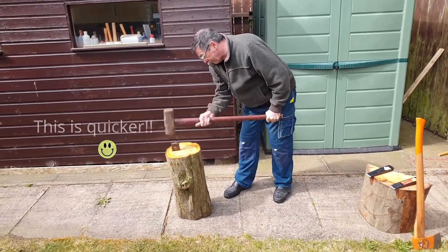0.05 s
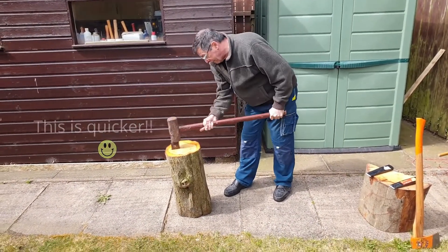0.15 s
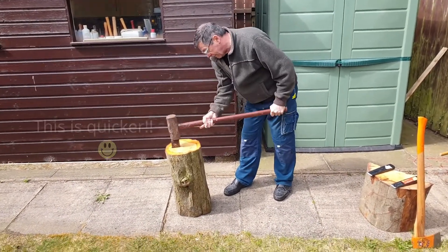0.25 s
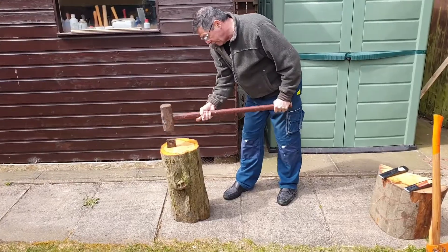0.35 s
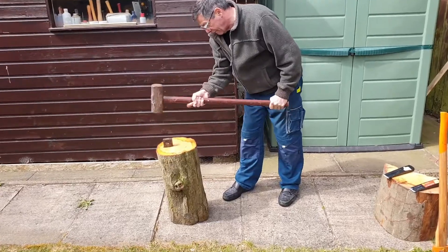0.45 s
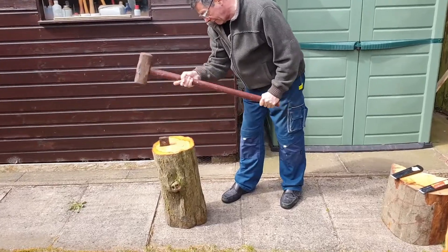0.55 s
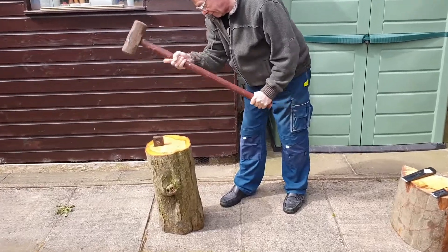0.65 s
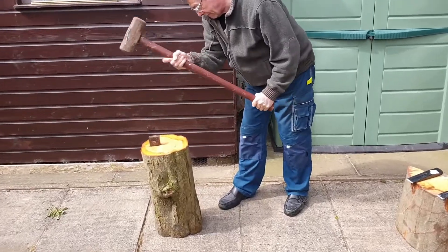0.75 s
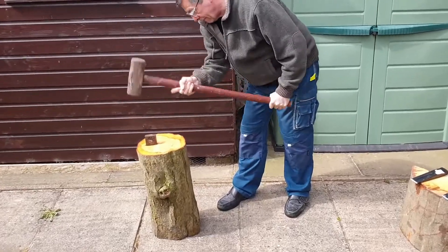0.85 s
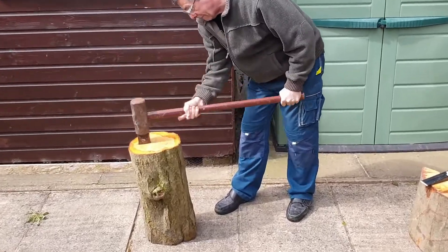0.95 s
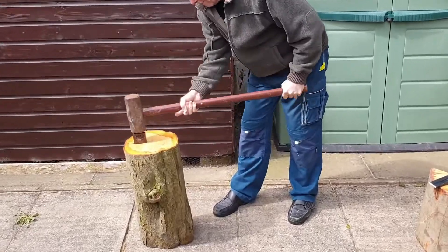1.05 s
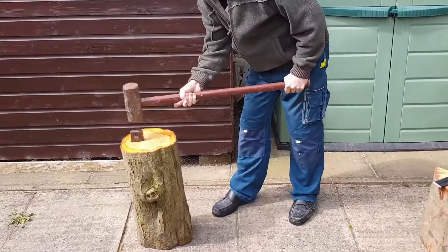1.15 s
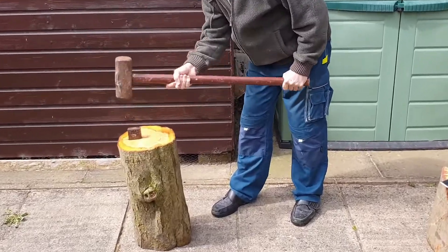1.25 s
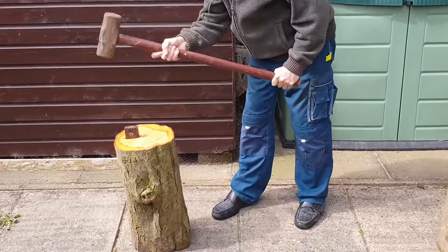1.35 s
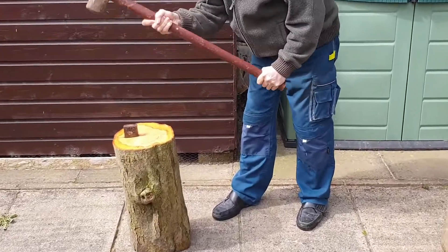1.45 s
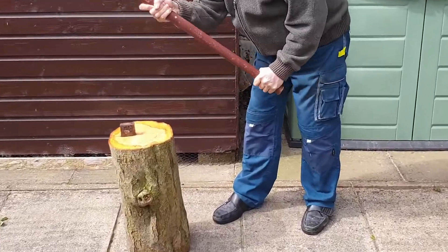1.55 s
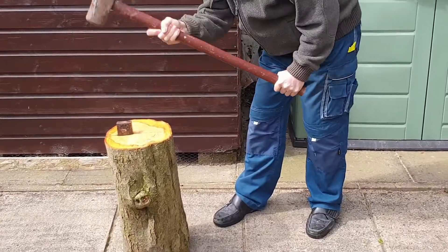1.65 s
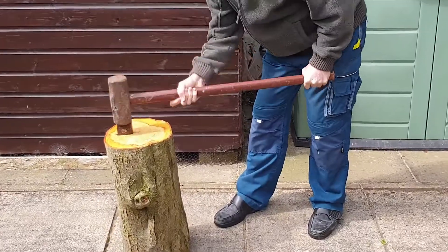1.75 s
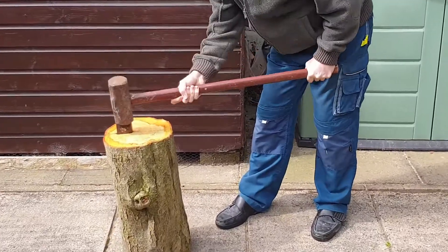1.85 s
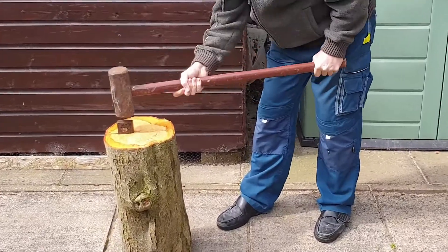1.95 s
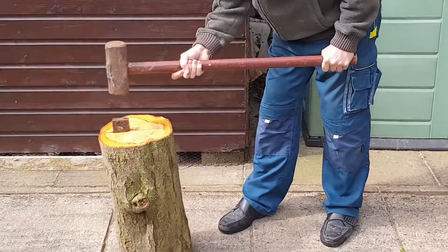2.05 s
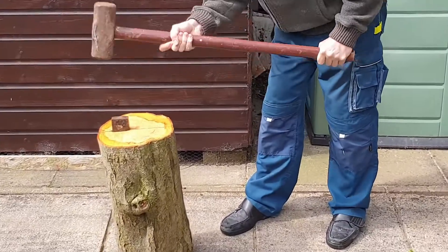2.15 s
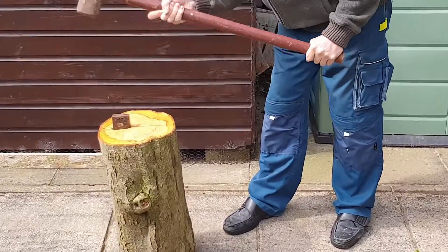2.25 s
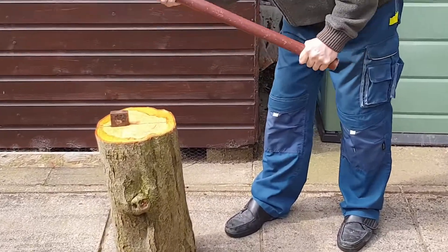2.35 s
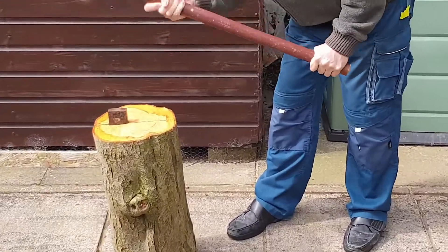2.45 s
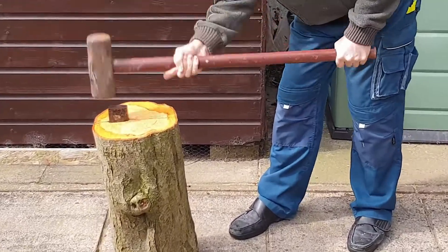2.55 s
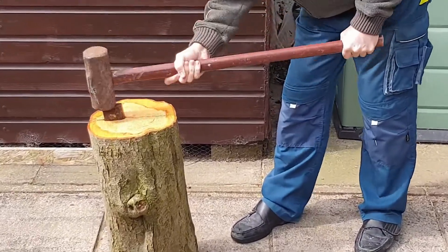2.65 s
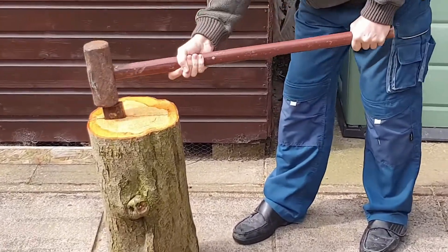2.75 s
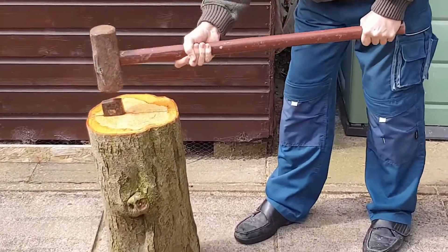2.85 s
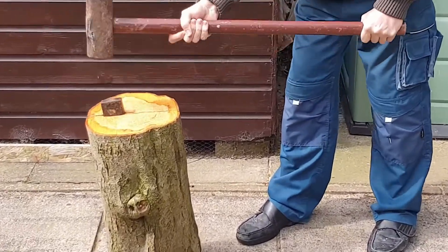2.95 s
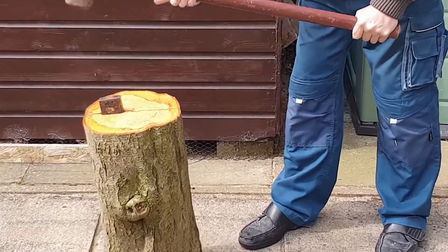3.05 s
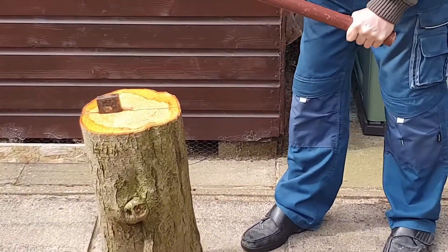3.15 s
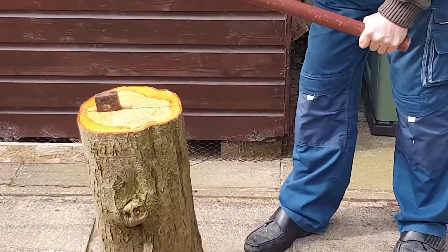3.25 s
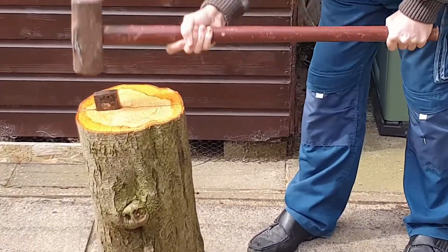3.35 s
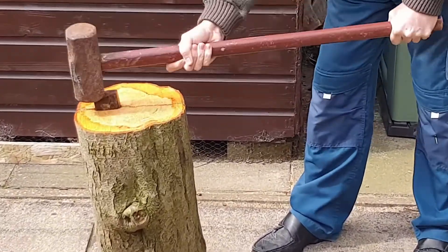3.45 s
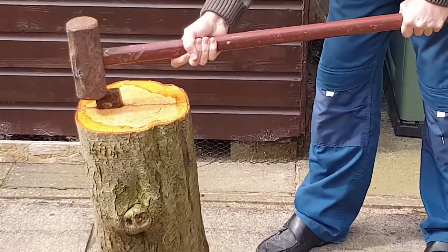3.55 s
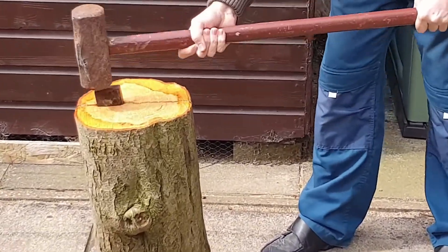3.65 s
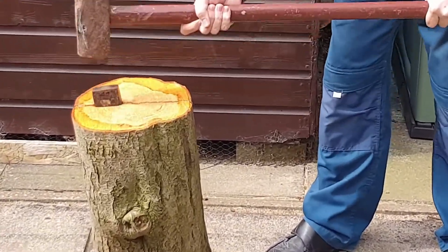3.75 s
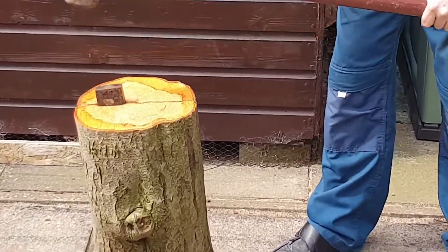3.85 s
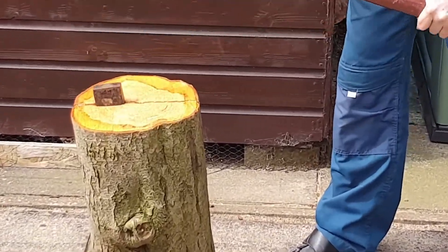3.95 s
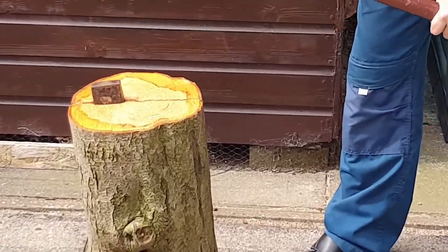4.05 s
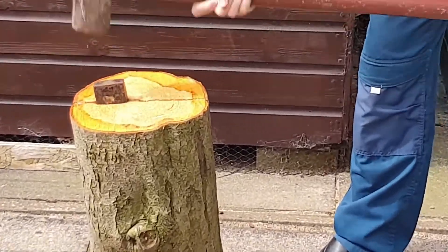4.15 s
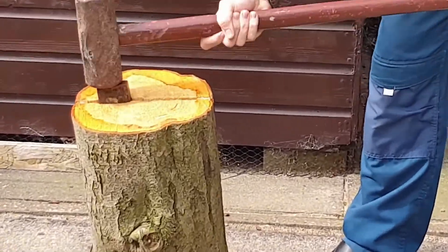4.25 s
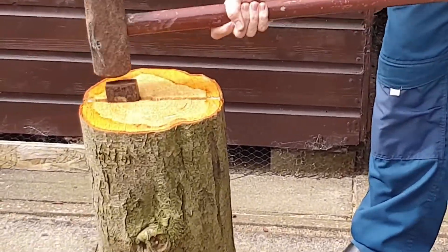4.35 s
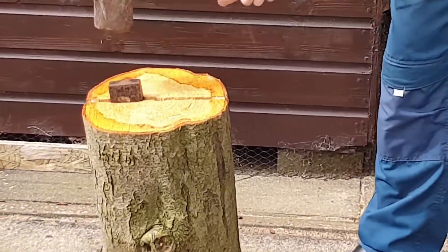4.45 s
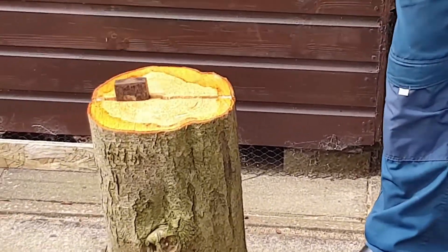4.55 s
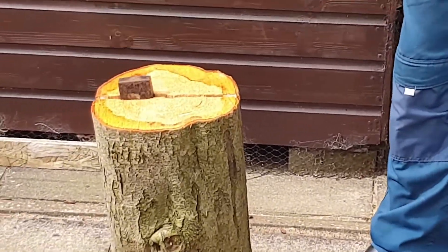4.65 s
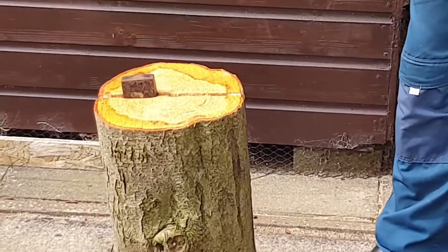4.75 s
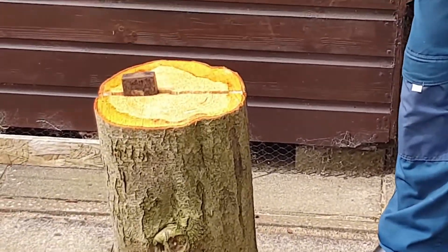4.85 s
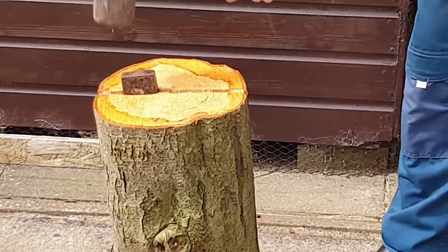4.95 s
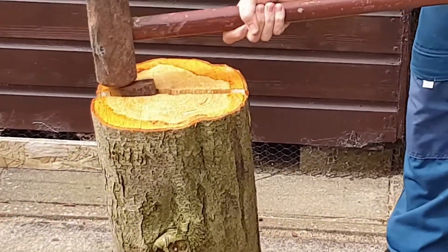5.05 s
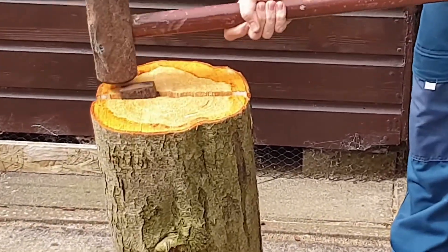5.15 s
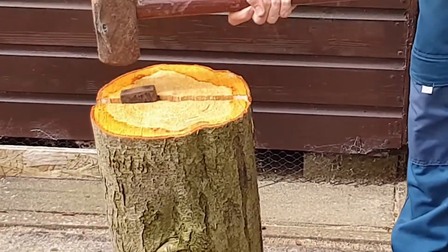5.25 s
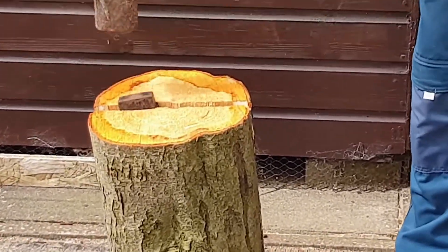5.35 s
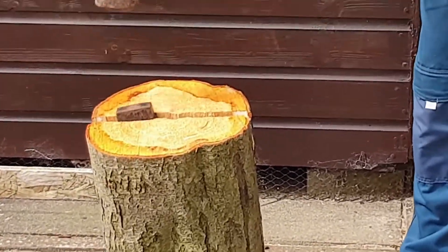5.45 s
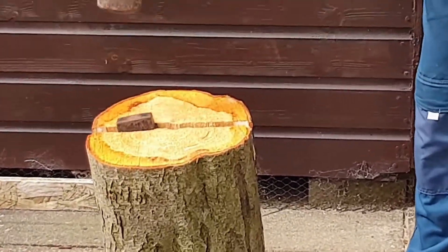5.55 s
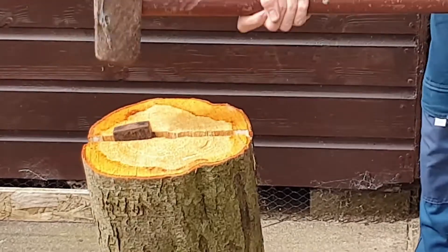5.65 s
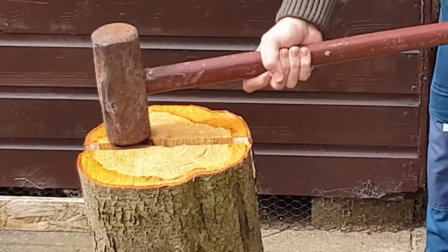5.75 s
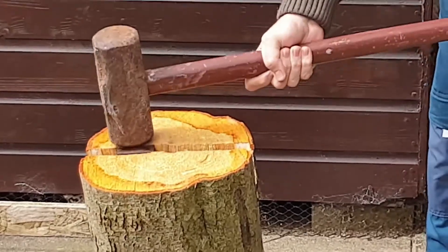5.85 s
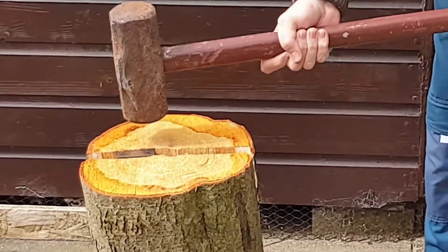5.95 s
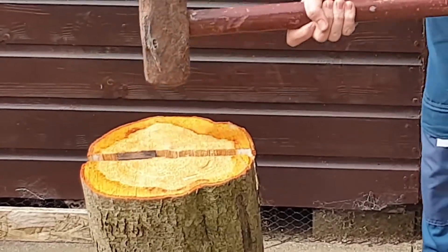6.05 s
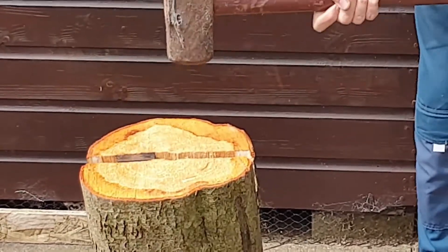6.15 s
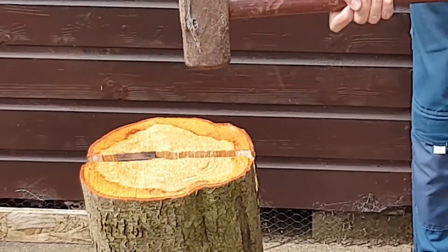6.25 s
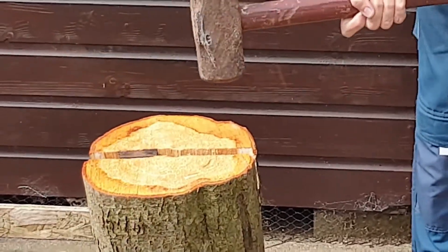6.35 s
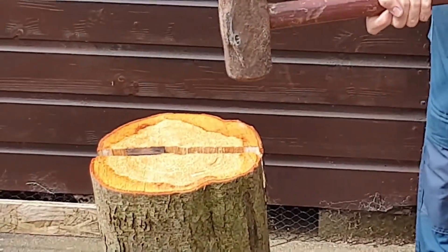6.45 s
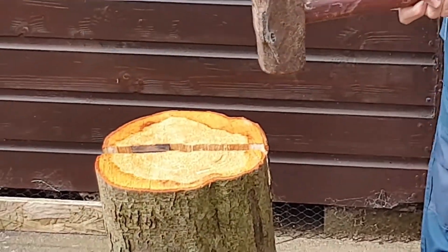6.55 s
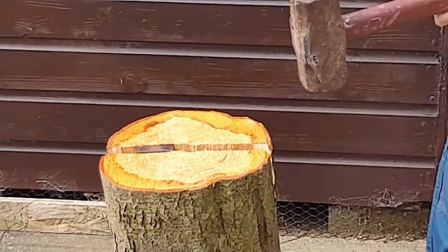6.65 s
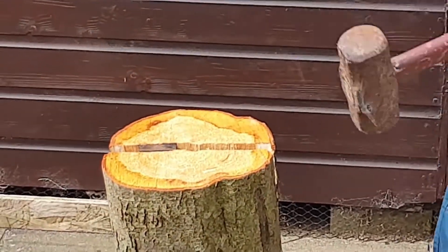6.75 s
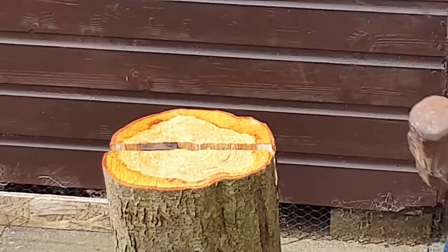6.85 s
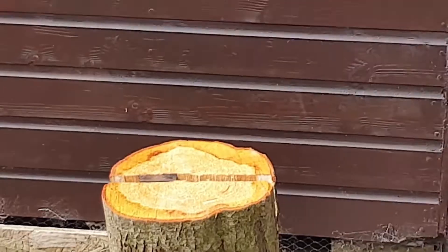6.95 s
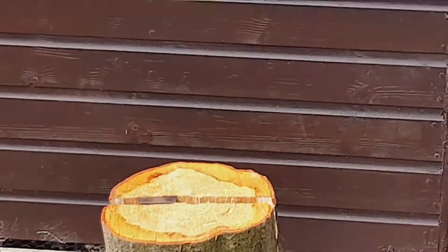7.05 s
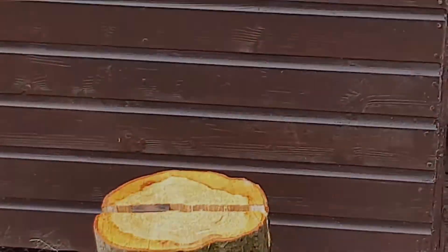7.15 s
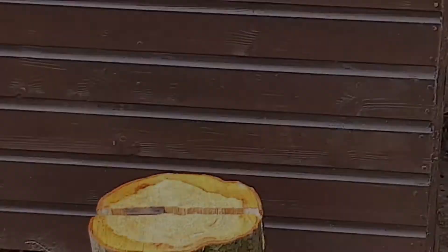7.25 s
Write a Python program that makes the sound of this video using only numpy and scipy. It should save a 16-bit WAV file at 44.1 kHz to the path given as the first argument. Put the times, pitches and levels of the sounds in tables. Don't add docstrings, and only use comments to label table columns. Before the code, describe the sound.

A quiet paved yard between sheds, close stereo microphone, faint air and distant thin bird chirps. A sledgehammer hits a steel wedge in a standing log at about 0.2, 1.0, 1.9, 2.7, 3.5, 4.3, 5.1 and 5.8 seconds. Each blow is an abrupt metallic crack, a dry short wooden thud with a tiny rebound, and a high steel ring, thrown back by walls in a brief bright tail. The first is dull; the sixth is a flat hard slap; the seventh rings brightest; the last is softer and woodier. From 3.3 seconds torn fibres tick between blows, with a sharp snap and bouncing splinter at 5.3. Light wind puffs grow into a strong low buffet around 5.5, then fluttering gusts from 6 to the end at about 7.3. Soles scuff over grit, clearest near 7.0.

```python
import sys
import numpy as np
from scipy import signal
from scipy.fft import rfft, irfft, next_fast_len
from scipy.io import wavfile
from scipy.ndimage import uniform_filter1d, minimum_filter1d

SR = 44100
rng = np.random.default_rng(int(sys.argv[2]) if len(sys.argv) > 2 else 0)


def put_to_file(sound):
    columns = np.atleast_2d(sound).T
    safe = np.clip(columns, -1, 1)
    whole_steps = np.round(safe * 32767)
    wavfile.write(sys.argv[1], SR, whole_steps.astype(np.int16))


def rack_gain(trim_db):
    fader = np.asarray(trim_db, float)
    return 10 ** (fader / 20)


N = 321038
LEVEL_TIMES = np.arange(0, N + 88, 88)
PORT_LAG_S = .0004

# start in seconds, crack in dB, crack tilt in dB per octave,
# crack sent to the yard in dB, slap in dB.
BLOWS = [
    (0.19, -5, -3, 5, -8),
    (1.026, -4.5, 0.84, 5.5, 3),
    (1.869, -4, 0.74, 4, 4),
    (2.6804, -4, 0.4, 1, 1),
    (3.4883, -5, 0.65, 4, 4),
    (4.3005, -4.5, 0.7, 5, 8.5),
    (5.0995, -6, 2.6, 0.45, 4.5),
    (5.8268, -13.5, -0.94, 6, 3),
]
# pitch in Hz, level in dB, time to fall 60 dB in seconds.
BODY = [(233.6, 0.96, 0.031), (341.7, -1.6, 0.046)]
# pitch in Hz, level in dB, time to fall 60 dB in seconds.
KNOCK = [(422, -0.5, 0.016), (516, -8.5, 0.018)]


def evened(x):
    return x / np.sqrt(np.mean(x ** 2) + 1e-20)


def read(points, hz, order=1):
    table = np.transpose(points)
    return np.interp(np.log(hz + 1), np.log(table[0] + 1), table[order])


def add(mix, s, sound):
    part = mix[..., round(s * SR):][..., :sound.shape[-1]]
    part += sound[..., :part.shape[-1]]


def sides(pan_db):
    return rack_gain(np.array([[.5], [-.5]]) * pan_db)


def coloured(points, shape):
    size = next_fast_len(shape[-1])
    z = rfft(rng.standard_normal((shape[0], size)))
    hz = np.linspace(0, SR / 2, z.shape[-1])
    return evened(irfft(z * rack_gain(read(points, hz)), size)[:, :shape[-1]])


def ring(modes, db, drift, rise=1e-4, longer=1):
    t = np.arange(SR // 2) / SR
    chance = rng.standard_normal((len(modes), 2))
    total = 0
    for (hz, mode_db, t60), (a, b) in zip(modes, chance):
        fading = rack_gain(mode_db + 0.71 * a - 60 * t / (t60 * longer))
        total = total + fading * np.sin(2 * np.pi * hz * (1 + drift * b) * t)
    return rack_gain(db) * (1 - np.exp(-t / rise)) * total


def click(points, tilt_db, slap_db=0):
    slap_hz, slap_octaves = 1290, 0.54
    hz = abs(np.fft.fftfreq(2048, 1 / SR))
    tilt = tilt_db * np.log2((hz + 1) / 4000)
    slap = slap_db * np.exp(-(np.log2((hz + 1) / slap_hz) / slap_octaves) ** 2)
    log_gain = np.log(rack_gain(np.maximum(read(points, hz) + tilt + slap, -100)))
    pulse = np.fft.ifft(np.exp(np.conj(signal.hilbert(log_gain)))).real[:512]
    return pulse / np.linalg.norm(pulse)


def chatter(count, t60):
    hits = rng.standard_normal(count) * rack_gain(-8.5 - 60 * np.arange(count) / SR / t60)
    return np.concatenate([[1], hits])


def swell(s, db, half_s):
    return db - 9 * ((LEVEL_TIMES / SR - s) / half_s) ** 2


def pile(powers):
    levels = np.sqrt(sum(powers))
    return np.array([np.interp(np.arange(N), LEVEL_TIMES, level) for level in levels])


def lumps(rate_hz, depth_db):
    slow = signal.lfilter(*signal.butter(3, rate_hz, fs=SR), rng.standard_normal((2, N)))
    return evened(rack_gain(depth_db * evened(slow)))


def steady(x, span_s):
    span = round(span_s * SR)
    power = uniform_filter1d(uniform_filter1d(x ** 2, span), span)
    return evened(x / np.sqrt(power + 0.015))


def still_air():
    # frequency in Hz, level in dB.
    air_colour = [(18, -13.5), (30, 8), (70, -1), (206, -18.5), (455, -17.5), (3130, -28.5), (5160, -27),
                  (5740, -25.5), (7880, -24), (9230, -37.5), (14800, -29.5), (16500, -45)]
    return rack_gain(-71) * coloured(air_colour, (2, N))


def wind():
    # frequency in Hz, level in dB.
    rumble_colour = [(20, -13.5), (40, 12), (75, 8.5), (150, -3.5), (260, -17.5), (420, -63.5), (700, -110)]
    flutter_colour = [(150, -27), (280, 3.5), (450, -4.5), (650, -15), (900, -33.5), (1400, -55.5),
                      (2200, -120)]
    whip_colour = [(400, 4), (600, -22), (800, -6.5), (1000, -16.5), (1500, -44), (2200, -120)]
    # time in seconds, rumble in dB.
    breeze = [(0, -97.5), (.5, -81.5), (.8, -93), (2, -81.5), (3.1, -70.5), (3.999, -63.5), (4.9, -87),
              (5.4, -57), (7.28, -64)]
    # peak in seconds, rumble in dB, half length in seconds, left-right in dB.
    puffs = [(0.084, -59.5, 0.064, 0.5), (0.453, -51, 0.052, 0), (0.56, -68, 0.049, 2),
             (0.644, -57.5, 0.026, 4.5), (0.96, -63.5, 0.1, -1), (1.3, -50, 0.042, 2),
             (1.43, -59, 0.038, -4.5), (1.534, -64.5, 0.014, -13), (1.64, -80, 0.045, -18),
             (1.81, -71, 0.02, -6), (2.11, -53.5, 0.043, -12), (2.228, -44.5, 0.012, -11.5),
             (2.303, -54, 0.087, -4), (2.521, -63, 0.04, -5), (2.98, -49, 0.071, -14),
             (3.127, -55.5, 0.13, -17.5), (3.29, -54, 0.063, -23), (3.45, -74, .04, -7.5),
             (3.729, -36.5, 0.014, 9), (3.807, -47, 0.081, 3.5), (4.11, -58, 0.025, -10),
             (4.227, -52.5, 0.055, -14), (4.575, -49, 0.042, -8), (4.672, -52.5, 0.044, -16),
             (4.738, -57.5, .03, -13), (5.06, -68, 0.055, -8.5)]
    # peak in seconds, rumble in dB, half length in seconds, left-right in dB,
    # extra flutter in dB.
    buffets = [(5.438, -45.5, 0.033, -28, 8.5), (5.53, -20, 0.026, -3.5, -2), (5.589, -22, 0.03, -2.5, -2),
               (5.662, -47, 0.036, -21, 11), (5.78, -42.5, 0.055, -18, 1.5), (6.057, -34.5, 0.066, 2, -10),
               (6.19, -29, 0.043, -10.5, 5.5), (6.317, -33.5, 0.064, -11.5, 0),
               (6.405, -39, 0.024, -12.5, 9.5), (6.505, -42.5, 0.047, -11.5, -7),
               (6.609, -38.5, 0.022, -3, -9.5), (6.753, -49.5, 0.024, -5, -1),
               (6.827, -43, 0.054, -4.5, -1), (6.959, -52.5, 0.028, 9, 7), (7.022, -36.5, 0.027, 6, 2),
               (7.085, -32, 0.019, 7, 3.5), (7.145, -36, 0.018, -19.5, 12), (7.18, -34.5, 0.035, -9.5, 10),
               (7.235, -30.5, 0.023, 0, 12), (7.264, -23, 0.01, -1.5, 1.5)]
    breeze_pan_db = -16
    flutter_db, flutter_growth, flutter_pan = -62, 1.05, -0.21
    whip_db, whip_growth = -9, 1.2
    draught_shared = 0.27

    breeze_db = np.interp(LEVEL_TIMES / SR, *np.transpose(breeze))
    eddies = [(breeze_db, breeze_pan_db, 0)]
    eddies += [(swell(s, db, half), pan, 0) for s, db, half, pan in puffs]
    eddies += [(swell(s, db, half), pan, extra) for s, db, half, pan, extra in buffets]
    push = pile((rack_gain(db) * sides(pan)) ** 2 for db, pan, _ in eddies)
    shake = pile((rack_gain(flutter_db + flutter_growth * (db + 41.5) + extra)
                  * sides(flutter_pan * pan + 7.5)) ** 2 for db, pan, extra in eddies)
    pressure = coloured(rumble_colour, (2, N))
    rumble = steady(evened(pressure + draught_shared * pressure[::-1]), 0.0042) * push
    whip = coloured(whip_colour, (2, N)) * rack_gain(whip_db) * (shake * rack_gain(33)) ** whip_growth
    flutter = (coloured(flutter_colour, (2, N)) + whip) * rack_gain(4.5) * shake
    return rumble * lumps(22., 3.5) + flutter * lumps(40., 5.)


def birds():
    # start in seconds, end in seconds,
    # start pitch in Hz, end pitch in Hz, level in dB.
    chirps = [(.02, 0.189, 7115, 7600, -82), (0.703, 1.01, 6520, 5610, -76),
              (1.56, 1.66, 6250, 8280, -78.5), (1.663, 1.755, 7420, 8200, -80.5),
              (2.39, 2.49, 6390, 7500, -74.5), (2.491, 2.58, 6380, 7448, -77),
              (2.575, 2.67, 6580, 7340, -74.5), (5.52, 5.818, 6160, 4640, -75.5),
              (6.1, 6.6, 5000, 5180, -75.5), (6.45, 6.63, 5400, 8200, -74.5), (6.5, 6.63, 9860, 10600, -77),
              (6.55, 6.78, 6930, 6550, -76), (6.64, 6.75, 11600, 10800, -77),
              (6.145, 6.175, 14400, 12000, -83), (6.18, 6.22, 14690, 11600, -77)]
    whistles = [
        (2.119, 2.222, 6470, 6480, -67.5),
        (2.923, 3.17, 6590, 6380, -74),
        (3.18, 3.33, 4560, 4450, -78.5),
        (5, 5.089, 5230, 5170, -78.5),
    ]
    husky_notes = [
        (.03, .11, 3600, 3480, -77.5),
        (.09, .16, 3630, 3560, -73),
        (0.155, 0.19, 3520, 3410, -66),
        (2.44, 2.51, 3720, 4540, -81),
    ]
    out = np.zeros((2, N))
    for calls, width_hz in (chirps, 1000), (whistles, 46), (husky_notes, 310):
        for start, end, start_hz, end_hz, db in calls:
            size = round((end - start) * SR)
            a, b = rng.standard_normal((2, 2, SR))[..., :size]
            blur = signal.lfilter(*signal.butter(2, width_hz / 2, fs=SR), a + 1j * b)
            glide_hz = np.linspace(start_hz, end_hz, size)
            turn = np.exp(2j * np.pi * np.cumsum(glide_hz) / SR)
            call = evened((blur * turn).real) * signal.windows.tukey(size, .6)
            add(out, max(start, 0), rack_gain(db) * call)
    return out


def steel_crack(blow, spark_db, dull_db):
    # frequency in Hz, level in dB.
    crack_colour = [(470, -24.5), (800, -1.5), (1150, -6.5), (1700, -2.5), (3220, -7), (3750, -7),
                    (7530, -10), (10900, -17.5), (12300, -16), (13900, -11.5), (15500, -17.5),
                    (16500, -41.5)]
    _, crack_db, tilt_db, wet_db, slap_db = blow
    muffle = wet_db - 4.0
    crack = rack_gain(crack_db + 11.0) * click(crack_colour, tilt_db + .5 * muffle + dull_db, slap_db)
    spark = rack_gain(crack_db + spark_db + 8.0 + 0.32 * muffle) * click(crack_colour, tilt_db + 2.5, slap_db)
    return np.convolve(spark, chatter(count=400, t60=0.012)), crack * rack_gain(wet_db)


def end_grain_push(db):
    # frequency in Hz, level in dB.
    push_colour = [(70, -19.5), (140, -3), (350, 0), (700, -3.5), (950, -15), (1500, -47)]
    return rack_gain(db - 12.5 + 7) * np.convolve(click(push_colour, 0), chatter(count=1200, t60=0.051))


def log_thud(thud, rise, lean_db):
    # pitch in Hz, level in dB, time to fall 60 dB in seconds.
    deep = [(115, -2, 0.039), (150, -8, .035)]
    halves = [(599, -12.5, 0.11), (659.4, -2.5, 0.034), (740, -11.5, 0.005)]
    deep_db, body_db, knock_db, _, split_db = thud
    body = [(hz, db + side * lean_db, t60) for (hz, db, t60), side in zip(BODY, (-.5, .5))]
    clack = -ring(body, body_db + 6.5, 1 / 100, rise)
    clack -= ring(KNOCK, knock_db + 7.0, .012, rise)
    clack -= ring(halves, split_db + 3.5, 0.0028, rise)
    return clack, -ring(deep, deep_db + 4.5, 0.0055)


def wedge_ring(wedge_db, seat, end_db):
    # pitch in Hz, level in dB, time to fall 60 dB in seconds.
    gripped = [(1560, -21.5, 0.065), (1724, -30.5, 0.039), (2140, -20.5, 0.035), (2334, -26, 0.014),
               (2784, -29.5, 0.022), (4150, -22, .05)]
    top_db = max(db for _, _, db in seat)
    free_end = [(hz, db - top_db, 2.2 / np.clip(width, 30, 200)) for hz, width, db in seat]
    return ring(gripped, wedge_db, 0.017) + ring(free_end, -21 + wedge_db + end_db, 0)


def steel_ring(grip, longer):
    # pitch in Hz, level in dB, time to fall 60 dB in seconds.
    low = [(3833, -6, 0.1), (3886, -6, 0.3), (3925, -7, .09), (3788, -12, .09)]
    middle = [(4704, 0, 0.13), (4667, -7, 0.09), (4625, -12, .08), (5520, -13, 0.07)]
    upper = [(6992, -9, .13), (7530, -5, .12), (7747, -6, 0.13), (7715, -8, .07), (8457, -8, 0.07),
             (8970, -9, 0.08)]
    high = [(12015, 6, 0.12), (11985, -5, 0.07), (12280, -12, .12), (12620, -7, .06)]
    top = [(14272, -1, .22), (14600, -9, .1), (15110, -7, .07), (13650, -10, .1)]
    edge = [(11370, -2, 0.15), (10770, -4, 0.14), (11080, -5, 0.08), (9800, -8, .1)]
    families = low, middle, upper, high, top, edge
    return sum(ring(family, db, .0003, longer=longer) for family, db in zip(families, grip))


def blows():
    # deep thud, log body, bright knock, wedge, split clack,
    # all in dB.
    thuds = [(-25, -14, -15.5, -3, -15.5), (-21, -15, -16, -8, -16), (-18.5, -15.5, -15.5, -4, -16.5),
             (-15.5, -22, -19, -10.5, -25), (-18, -16.5, -21.5, -6.5, -17.5), (-14, -18.5, -14, -9, -12),
             (-18.5, -22.5, -16.5, -1, -11), (-25, -28.5, -16, -14, -11.5)]
    # 3.9, 4.7, 7.5, 12, 14 and 11 kHz families, all in dB.
    grips = [(-26.5, -33.5, -34.5, -22, -42, -39), (-30.5, -36.5, -27.5, -18, -41, -34.5),
             (-31, -31, -32, -20, -38.5, -38), (-32.5, -45.5, -31, -26, -40, -40),
             (-32.5, -42.5, -28.5, -24, -24.5, -34.5), (-40.5, -38, -31.5, -23.5, -38.5, -34.5),
             (-14, -16, -17, -24.5, -32, -32.5), (-11.5, -25.5, -20, -36, -27, -26.5)]
    # wood rise in seconds, rebound delay in seconds, rebound in dB,
    # steel ring length factor, spark in dB.
    landings = [(.0011, .011, -11.5, 1.01, 0.3), (.0011, .011, -13.5, 1.01, -0.87),
                (.0011, 0.01, -8.5, 0.91, 0), (.0011, 0.014, -9.5, 1.01, 1.1),
                (.0011, .011, -14.5, 1.1, -0.6), (.002, .0105, -5.5, 1.01, -0.7),
                (.002, 0.01084, -6, 1.1, -1), (.003, 0.01092, 4, 1.03, -3)]
    # pitch in Hz, width in Hz, level in dB.
    seats = [
        [(2351, 97, -1), (3620, 25, -4.5), (4340, 99, -1), (5460, 79, -8.5)],
        [(2540, 57, -2), (3910, 53, -1), (4320, 53, -4), (5400, 41, -1.5)],
        [(1520, 57, -3), (3760, 68, -2.5), (4330, 82, -1.5), (5070, 97, -1)],
        [(1520, 59, -0.5), (2120, 26, -4), (3490, 240, -2.5), (5560, 130, -7.5)],
        [(2070, 130, 4), (3350, 75, -2), (5414, 55, -3.5), (6380, 88, -1)],
        [(1550, 97, -2), (3080, 130, -4), (4290, 210, -3), (4990, 140, -6.5)],
        [(1442, 54, 2), (2092, 29, -6.5), (2490, 45, -5.5), (2800, 50, -10)],
        [(1590, 47, -7.5), (2200, 46, -17), (2360, 26, -1.5), (2777, 100, 2)],
    ]
    # lean to the log's upper body tone in dB, treble lost on the way to
    # the yard in dB per octave, wedge end ring in dB, dull push in dB.
    sits = [(3, -.5, 0.5, 0.5), (-2.5, -1, 2.5, -1.5), (-3.5, -1, 1, -2.5), (-1, -.5, 2.5, -1.14),
            (-0.8, -1, 2.5, -0.4), (9, -1.7, 0, -6), (-1.9, -1, 2.5, -2.5), (2, -1, 7.5, -5)]
    wood_paths = rack_gain([[3], [-3.5]])
    steel_paths = rack_gain([[-8.5], [-13], [0.5]])
    out = np.zeros((3, N))
    for blow, thud, grip, landing, seat, sit in zip(BLOWS, thuds, grips, landings, seats, sits):
        s, crack_db = blow[:2]
        rise, rebound, rebound_db, longer, spark_db = landing
        lean_db, dull_db, end_db, push_db = sit
        spark, crack = steel_crack(blow, spark_db, dull_db)
        add(out[0], s, spark)
        add(out[1], s, crack)
        add(out[:2], s, end_grain_push(crack_db + push_db) * wood_paths)
        clack, deep_thud = log_thud(thud, rise, lean_db)
        add(out[:2], s, (clack + deep_thud) * wood_paths + wedge_ring(thud[3], seat, end_db))
        add(out[0], s + rebound, rack_gain(rebound_db) * clack)
        add(out, s, steel_ring(grip, longer) * steel_paths)
    return out


def walls():
    # delay in seconds, bass in dB, left treble in dB, right treble in dB,
    # blur in seconds.
    echoes = [(.0035, -1.5, 3.5, 5, 0.0011), (0.011, -5, -6, -2, 0.001), (0.022, -16, -14, -18, 0.0024),
              (.032, -15.5, -13.5, -7, 0.0015), (0.045, -16, -11, -10, .005),
              (0.099, -29, -27, -27, 0.0071), (0.169, -67.5, -36, -36.5, 0.0093)]
    split_hz, wall_top_hz = 700, 12000
    t = np.arange(1024) / SR
    bass, treble = np.zeros((2, 2, SR // 4))
    for s, bass_db, left_db, right_db, blur in echoes:
        rough = rng.standard_normal((2, len(t))) * np.exp(-t / blur)
        rough /= np.linalg.norm(rough, axis=1, keepdims=True)
        add(treble, s, rack_gain([[left_db], [right_db]]) * rough)
        bass[:, round(s * SR)] = rack_gain(bass_db)
    response = signal.lfilter(*signal.butter(2, split_hz, fs=SR), bass)
    response += signal.lfilter(*signal.butter(2, [split_hz, wall_top_hz], "band", fs=SR), treble)
    hum_delay_s, hum_hz, hum_db, hum_swell_s = .0505, 270, -44, .006
    hum_level = rack_gain(hum_db) * t / hum_swell_s * np.exp(-(t / hum_swell_s) ** 2 / 2)
    add(response, hum_delay_s, hum_level * np.sin(2 * np.pi * hum_hz * t))
    direct = signal.unit_impulse(1024)
    low = signal.lfilter(*signal.butter(1, 2 * split_hz, fs=SR), direct)
    add(response, 0, low)
    add(response[0], 0, direct - low)
    add(response[1], PORT_LAG_S, direct - low)
    return response


def yard():
    # frequency in Hz, near level in dB, near time to fall 60 dB in seconds, far level in dB,
    # far time to fall 60 dB in seconds, left-right likeness.
    scatter = [(90.5, -6.5, 0.42, -23, 0.3, 0.82), (258, -12.5, 0.23, -24.5, 0.38, 1),
               (430, -15.5, 0.42, -24, 0.75, 0.78), (710, -14, 0.097, -27.5, 0.29, 0.93),
               (1240, -7, 0.14, -27, 0.52, 0.091), (2560, -1, 0.19, -28, 0.63, 0.069),
               (5000, 0.8, 0.24, -26, 0.66, 0.073), (9200, 0.5, 0.18, -28.5, 0.5, 0.13),
               (14300, 0.5, 0.21, -36.5, 0.67, 0.61), (15400, -6.5, 0.12, -54.5, 0.3, 0.45),
               (16000, -34.5, .05, -79.5, .2, .45)]
    yard_db, rise_s, patch_db = 2, 0.017, 2.5
    houses_s, houses_spread_s, houses_db = .275, 0.02, 3.5
    size = SR * 3 // 4
    hz, t, (a, b) = signal.stft(rng.standard_normal((2, size)), SR, nperseg=256)
    near_db, near, far_db, far, same = (read(scatter, hz, order=k)[:, None] for k in range(1, 6))
    same = np.clip(same, -1, 1)
    z = np.array([a, same * a + np.sqrt(1 - same ** 2) * b])
    patches = uniform_filter1d(rng.standard_normal(a.shape), size=3, axis=0)
    patches = uniform_filter1d(patches, size=9, axis=1)
    z *= rack_gain(patch_db * evened(patches))
    late_db = houses_db * np.exp(-((t - houses_s) / houses_spread_s) ** 2)
    fading = rack_gain(near_db - 60 * t / near) + rack_gain(far_db - 60 * t / far + late_db)
    tail = signal.istft(z * fading, SR, nperseg=256)[1][:, :size]
    tail *= 1 - np.exp(-np.arange(size) / SR / rise_s)
    return rack_gain(yard_db) * tail / np.linalg.norm(tail[0])


def echoed(far):
    out = np.zeros((2, N))
    edges = [0] + [round(SR * row[0]) - 50 for row in BLOWS[1:]] + [N]
    for a, b in zip(edges, edges[1:]):
        add(out, a / SR, signal.fftconvolve(far[None, a:b], yard(), axes=1))
    return out


def ticks():
    # frequency in Hz, level in dB.
    snap_colour = [(290, -27), (500, 1), (2170, -9), (3320, -8), (4200, -8.5), (8240, -17), (15300, -8.5),
                   (16700, -19)]
    # start in seconds, level in dB, tilt in dB per octave.
    tears = [(1.4248, -63, -1), (3.2543, -63.5, 3.5), (3.324, -80, -4), (3.3705, -67.5, 0.5),
             (3.3795, -54, 6), (3.7821, -41.5, 0), (3.906, -70, 0), (4.5924, -45, -0.5), (4.6255, -59, 6.5),
             (4.6921, -50, 3), (4.7065, -48.5, 3), (4.7373, -53.5, 3), (4.8446, -65, 2), (5.3298, -24.5, 1),
             (5.335, -39, 1), (5.3864, -56, 1.5), (6.17, -57, 4), (6.38, -66.5, 4), (6.4004, -75.5, 4.5),
             (6.7788, -67.5, 3), (6.9564, -47.5, -1.5), (6.9693, -51, -4), (7.0318, -48, -0.5),
             (7.135, -51.5, -1), (7.169, -56, 3), (7.205, -56, 6)]
    out = np.zeros((2, N))
    for s, db, tilt_db in tears:
        snap = rack_gain(db + 9.5) * click(snap_colour, tilt_db)
        add(out[0], s, np.convolve(snap, chatter(count=200, t60=.004)))
        add(out[1], s, 0.84 * snap)
    return out


def log_bumps():
    # start in seconds, level in dB.
    bumps = [
        (1.987, -39),
    ]
    out = np.zeros(N)
    for s, db in bumps:
        add(out, s, ring(BODY + KNOCK, db, 0.049))
    return out


def splinter():
    # pitch in Hz, level in dB, time to fall 60 dB in seconds.
    chip = [(507, -0.5, 0.027), (980, -16.5, 0.023), (2150, -12, 0.026)]
    # start in seconds, level in dB.
    bounces = [
        (5.3297, -33.5),
        (5.355, -43),
        (5.381, -41),
    ]
    out = np.zeros(N)
    for s, db in bounces:
        add(out, s, ring(chip, db, 0.024))
    return out


def scuffs():
    # frequency in Hz, level in dB.
    rustle = [(530, -15), (900, 1), (1480, -7), (2900, -4.5), (8870, -13), (10500, -9.5), (13700, -9),
              (15900, -20), (16500, -26.5)]
    # peak in seconds, level in dB, half length in seconds, left-right in dB.
    steps = [
        (6.413, -77.5, 0.019, 11),
        (6.605, -78, .2, 8),
        (6.82, -64, .03, 18),
        (6.914, -75, 0.068, 14),
        (7.011, -53, 0.041, 6),
        (7.033, -49, 0.021, -0.5),
        (7.095, -64, 0.055, 0.5),
        (7.147, -70, 0.034, 0.5),
        (7.223, -64.5, 0.1, 3.5),
    ]
    level = pile((rack_gain(swell(s, db, half)) * sides(pan)) ** 2 for s, db, half, pan in steps)
    return coloured(rustle, (2, N)) * lumps(150., 1.2) * level


def scene():
    near, far, beam = blows()
    near_ticks, far_ticks = ticks()
    near = near + near_ticks + log_bumps() + splinter()
    struck = signal.fftconvolve(near[None], walls(), axes=1)[:, :N] + echoed(far + far_ticks)
    struck += np.array([beam, np.roll(beam, round(PORT_LAG_S * SR))])
    return struck * sides(2.2) + wind() + scuffs() + birds() + still_air()


def band_limit(x):
    return signal.sosfilt(signal.butter(12, 16810, fs=SR, output="sos"), x)


def record(dry):
    thinned = signal.lfilter(*signal.butter(3, 50., "high", fs=SR), dry)
    room_left = np.minimum(.93 / (abs(thinned).max(0) + 1e-9), 1)
    gain = uniform_filter1d(minimum_filter1d(room_left, size=129), size=129)
    return band_limit(thinned * gain)


dry = scene()
out = record(dry)
put_to_file(out)
```